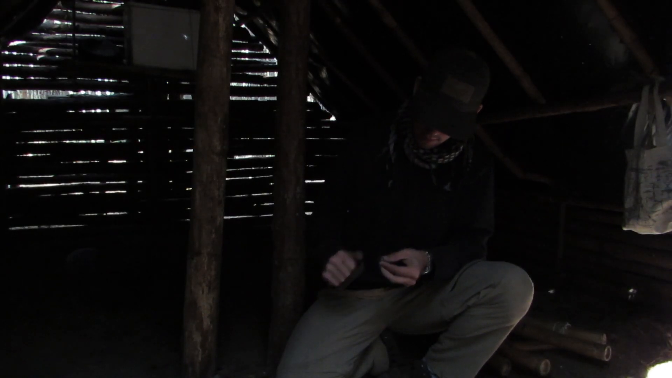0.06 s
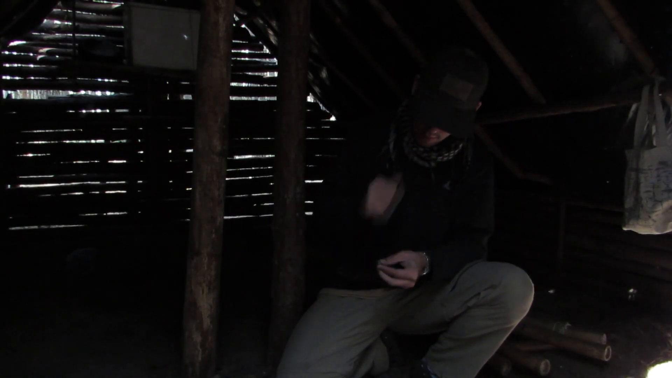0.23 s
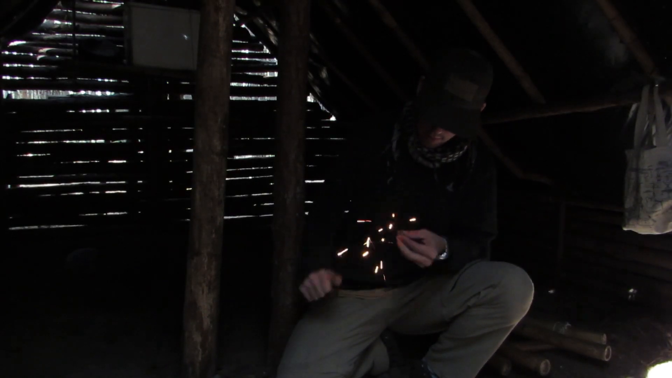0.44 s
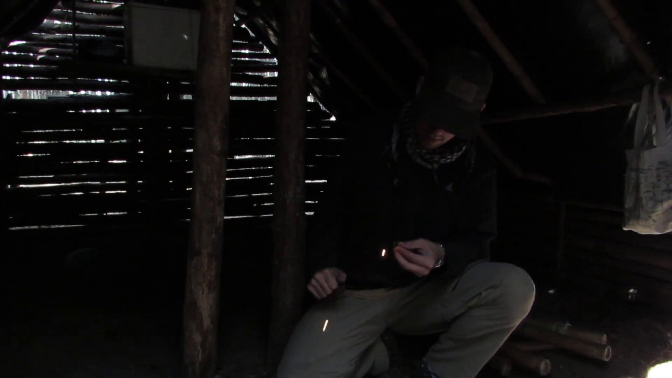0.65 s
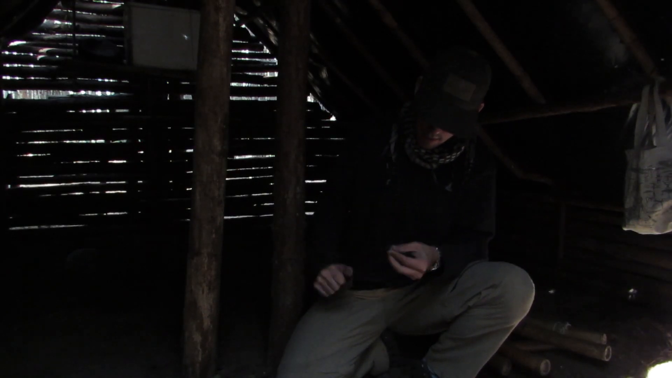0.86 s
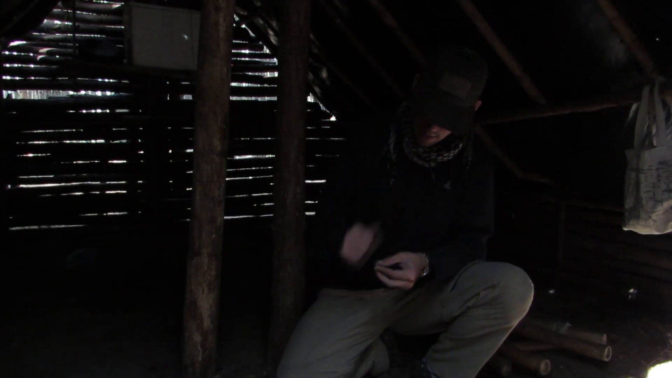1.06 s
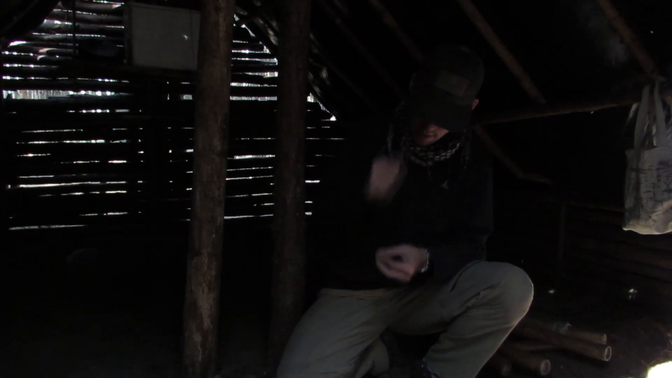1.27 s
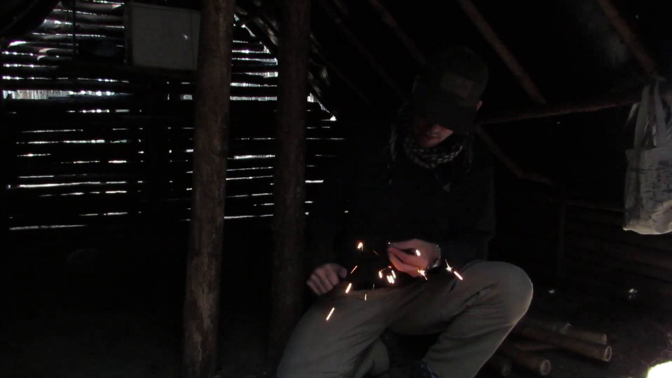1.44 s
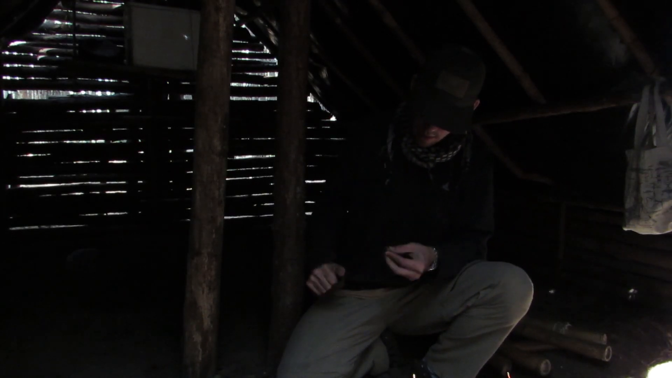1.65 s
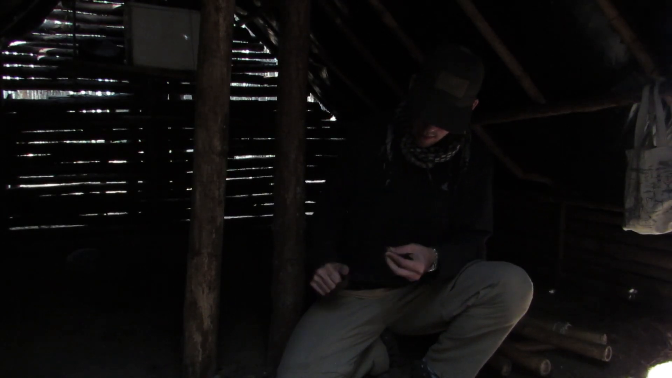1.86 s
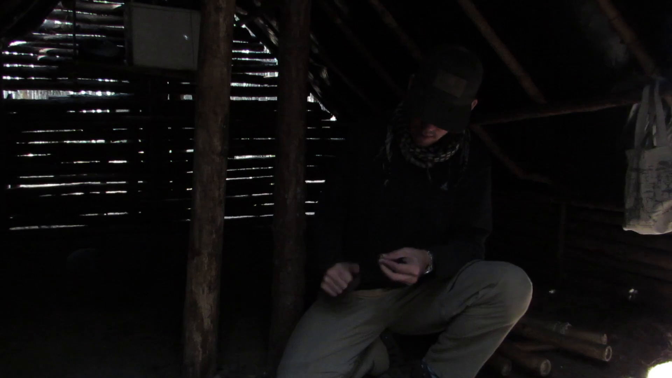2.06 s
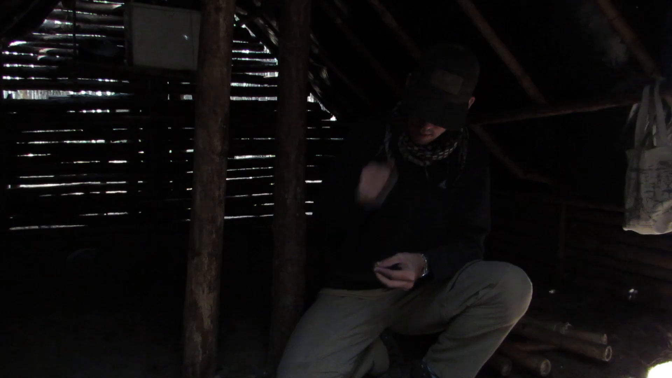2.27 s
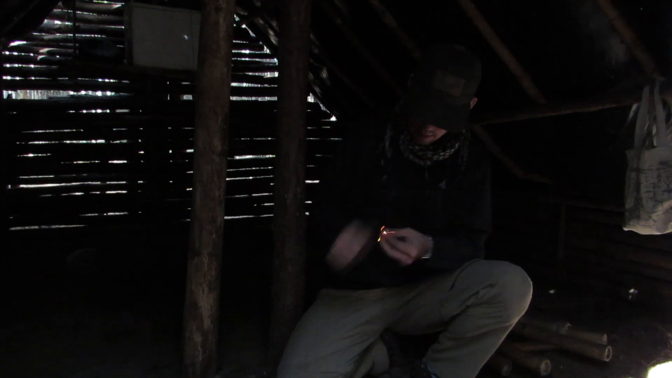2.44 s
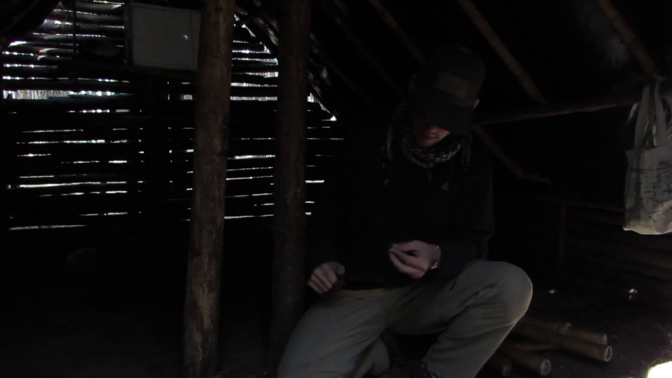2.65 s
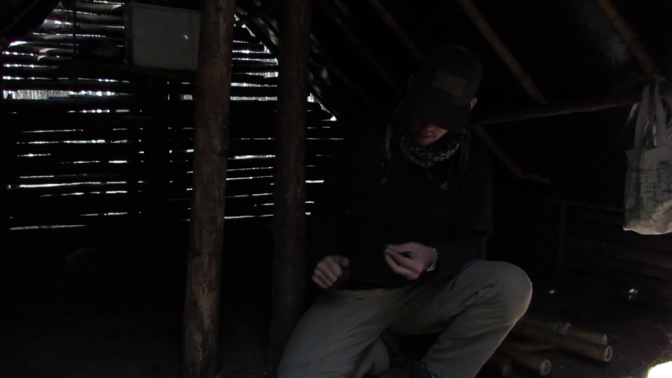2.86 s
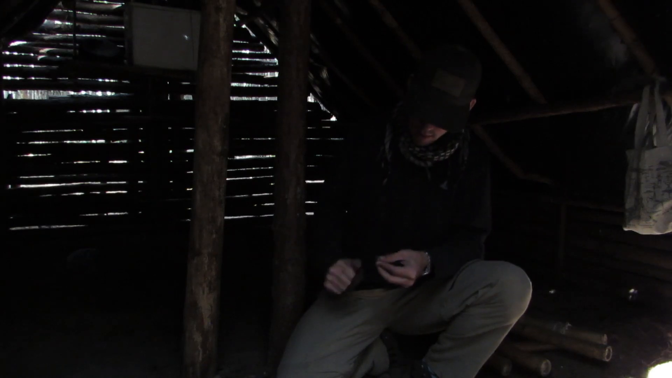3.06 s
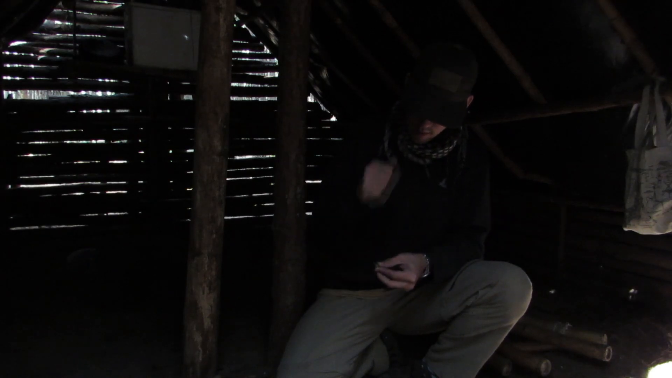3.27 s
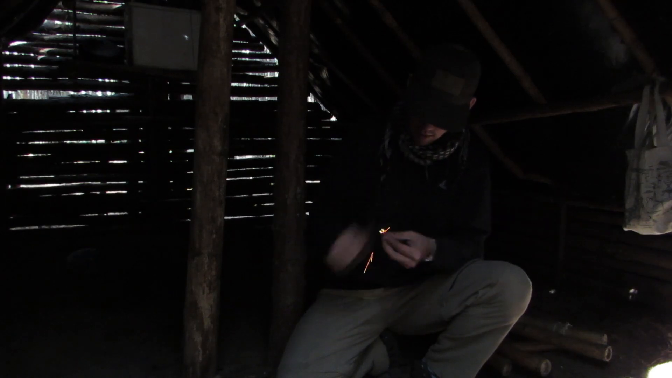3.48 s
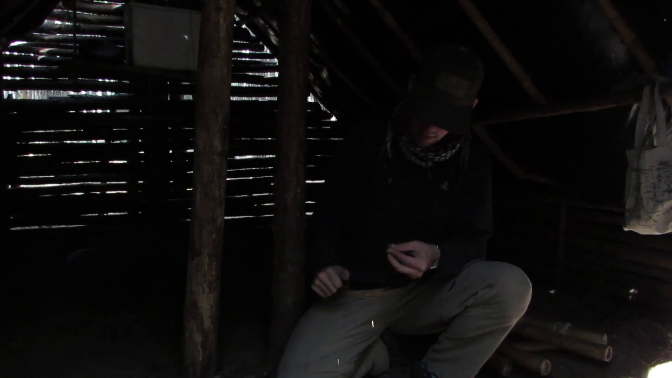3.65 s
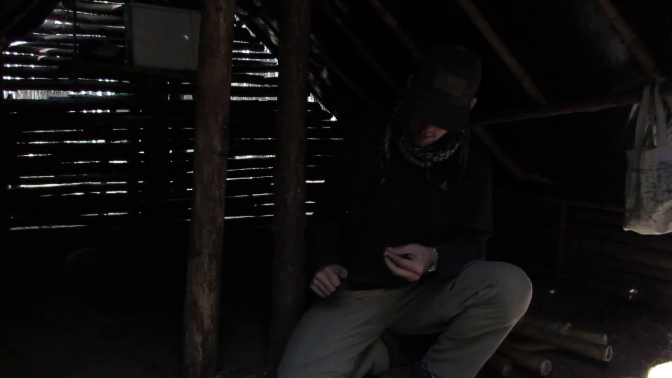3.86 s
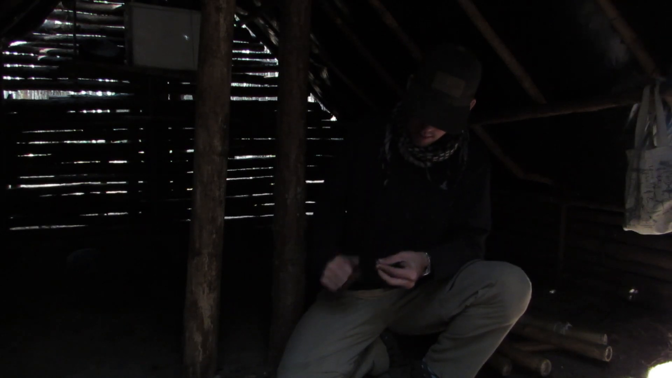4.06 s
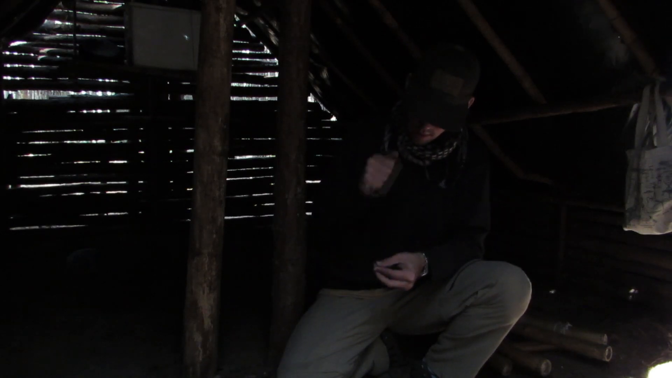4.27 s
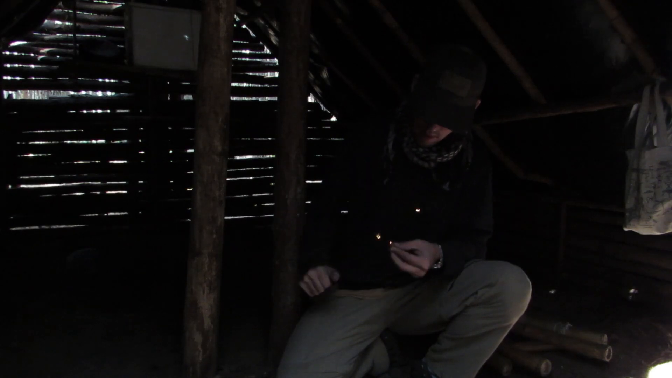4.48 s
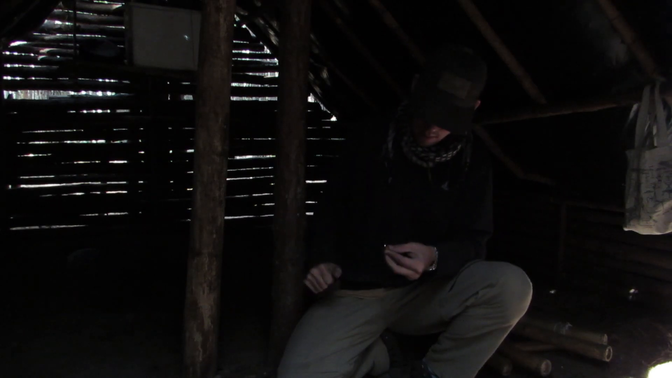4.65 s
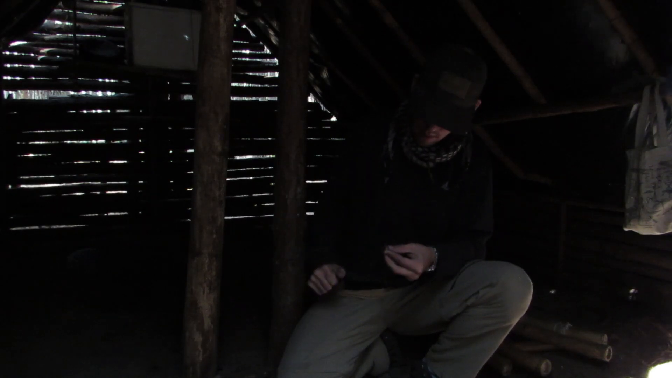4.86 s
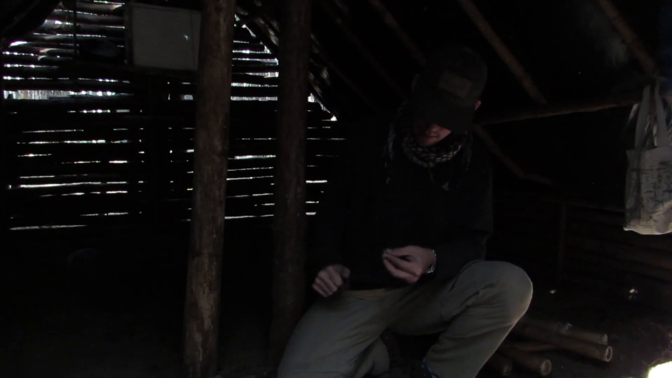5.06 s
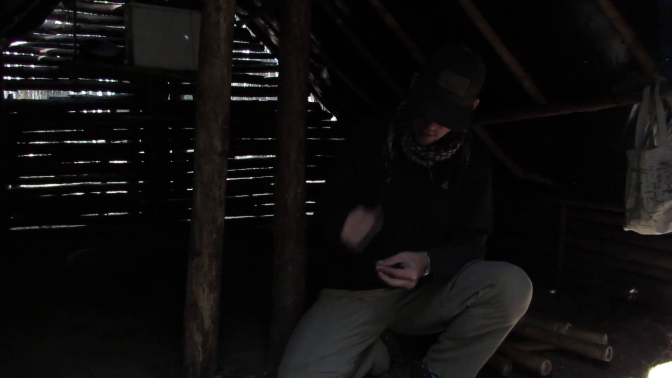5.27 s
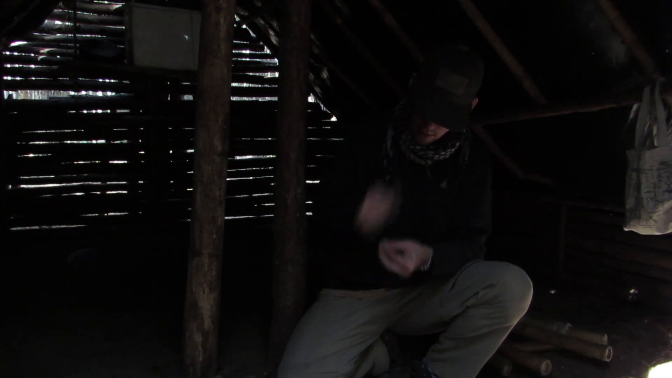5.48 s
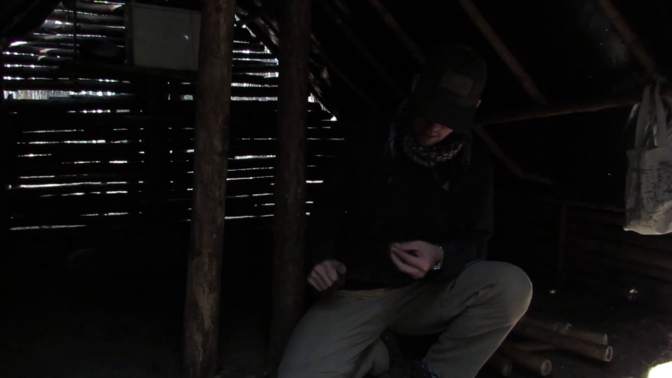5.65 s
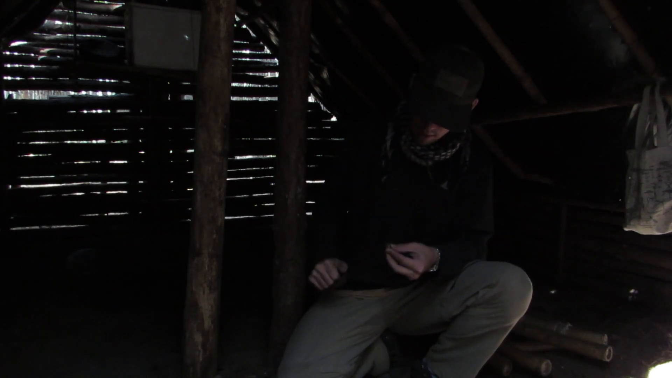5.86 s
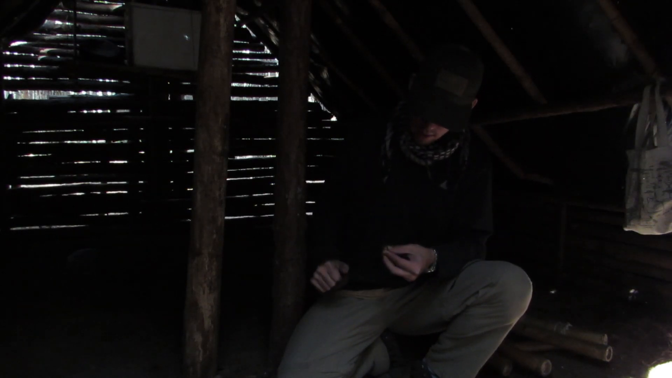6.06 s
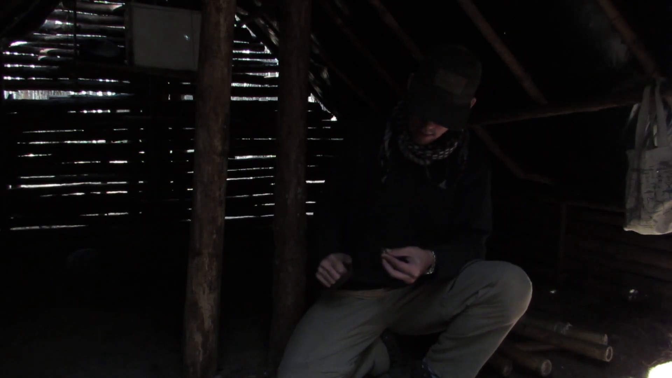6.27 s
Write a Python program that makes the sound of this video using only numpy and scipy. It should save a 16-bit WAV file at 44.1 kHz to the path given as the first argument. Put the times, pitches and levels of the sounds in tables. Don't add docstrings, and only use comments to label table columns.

```python
import sys
import numpy as np
from scipy import signal
from scipy.io import wavfile
from scipy.ndimage import uniform_filter1d

SR = 44100
rng = np.random.default_rng(int(sys.argv[2]) if len(sys.argv) > 2 else 0)


def volts_from_db(level):
    exponent = np.asarray(level, float) / 20
    return 10 ** exponent


def bounce(signal):
    frames = np.transpose(np.atleast_2d(signal))
    limited = np.clip(frames, -1, 1)
    pcm = np.round(limited * 32767).astype(np.int16)
    wavfile.write(sys.argv[1], SR, pcm)


N = 278701


def evened(x):
    return x / np.sqrt(np.mean(x ** 2) + 1e-20)


def read(points, hz):
    f, value = np.transpose(points)
    return np.interp(np.log(hz + 1), np.log(f + 1), value)


def add(mix, s, sound):
    part = mix[round(s * SR):][:len(sound)]
    part += sound[:len(part)]


def coloured(x, points):
    db = np.maximum(read(points, np.fft.rfftfreq(2048, 1 / SR)), -100)
    log_gain = np.log(volts_from_db(db))
    circle = np.concatenate([log_gain, log_gain[-2:0:-1]])
    taps = np.fft.ifft(np.exp(np.conj(signal.hilbert(circle)))).real[:1024]
    return signal.oaconvolve(x, taps)[:len(x)]


def resonate(x, hz, width):
    pole = np.exp((2j * np.pi * hz - np.pi * width) / SR)
    return 2 * signal.lfilter([1 - abs(pole)], [1, -pole], x).real


# (frequency [Hz], density [dB per Hz])
HISS_COMMON = [(18, -45), (30, -18), (333, -8.5), (421, -11), (574, -2), (688, -17), (804, -8), (1540, -14),
               (1790, -15.5), (2580, -16), (4000, -20), (4550, -20.5), (7260, -21.5), (12500, -30),
               (14600, -35)]
HISS_OPPOSED = [(18, -40), (30, -11.5), (70, -12.5), (271, -1.5), (559, -3.5), (670, -4), (744, -5),
                (1350, -11), (1840, -11.5), (3250, -18.5), (4000, -21.5), (7260, -23), (14600, -34.5)]


def hiss():
    size, hop, patchy_db = 1024, 256, 1.0
    hz = np.fft.rfftfreq(size, 1 / SR)

    def layer(points, db):
        a, b, patches = rng.standard_normal((N // hop + 5, len(hz), 3)).T
        patches = uniform_filter1d(patches, 10, 0)
        patches = evened(uniform_filter1d(patches, 14, 1))
        z = (a + 1j * b) * volts_from_db(read(points, hz)[:, None] + patchy_db * patches)
        return volts_from_db(db) * evened(signal.istft(z, nperseg=size, noverlap=size - hop)[1][:N])

    mid, side = layer(HISS_COMMON, -51), layer(HISS_OPPOSED, -47.5)
    return np.array([mid + 1.19 * side, mid - side])


# (frequency [Hz], width [Hz], level [dB], share that differs between the ports [0-1])
HUM_BANDS = [(65, 16, -70, .5), (243.7, 12, -74, .3), (515.8, 4.7, -62, .2), (572, 3.3, -57.5, 0.16),
             (640.4, 5.2, -62.5, .2), (805.6, 87, -57, .4), (1025, 15, -63, .3), (1189, 44, -65.5, .3),
             (1798, 76, -64, .4), (2543, 32, -69.5, .4)]


def hum():
    noise, out = rng.standard_normal((2, N)), np.zeros((2, N))
    for hz, width, db, apart in HUM_BANDS:
        band = resonate(resonate(noise, hz, 2 * width), hz, 2 * width)
        mid, side = volts_from_db(db) * evened(band)
        out += [mid + apart * side, mid - apart * side]
    return out


# (time [s], level [dB], hold [s])
AIR_PUFFS = [(.365, -48, .015), (1.28, -66.5, .02), (1.565, -44.5, 0.024), (1.88, -69.5, 0.085),
             (2.9, -51.5, .15), (3.15, -49, 0.069), (3.52, -62.5, .02), (3.63, -59, 0.016),
             (3.94, -65, .08), (4.25, -72, 0.16), (5.53, -56, 0.026), (5.63, -59.5, .05),
             (5.98, -67.5, 0.083), (6.11, -53, .03), (6.28, -62.5, .05)]


def draught():
    rise_s, fall_db_per_s = 0.008, 279.5
    calm_db, flutter_db, flutter_s = -74, 5.5, 0.08
    t = np.arange(N) / SR
    rumble_band = signal.butter(2, [18, 57.5], "band", fs=SR, output="sos")
    mid, side = evened(signal.sosfilt(rumble_band, rng.standard_normal((2, N))))
    span = round(flutter_s * SR)
    flutter = evened(uniform_filter1d(uniform_filter1d(rng.standard_normal(N), span), span))
    air = volts_from_db(calm_db + flutter_db * flutter)
    for s, db, held in AIR_PUFFS:
        rise = np.exp(np.minimum(t - s, 0) / rise_s)
        air += rise * volts_from_db(db - fall_db_per_s * np.maximum(t - s - held, 0))
    return volts_from_db(11) * air * np.array([0.2 * mid + 1.1 * side, 0.2 * mid - side])


# (frequency [Hz], t60 [s])
HUT_DECAY = [(300, 0.14), (1500, 0.078), (4000, 0.094), (8000, 0.092), (14000, 0.077)]


def hut(x):
    port_gap = 3
    at = np.arange(20, 8000, 10) + rng.integers(0, 10, (3, 1, 798))
    both_ports = np.concatenate([at, at + rng.integers(-port_gap, port_gap, at.shape)], axis=1)
    taps = np.zeros((3, 2, 8192))
    np.put_along_axis(taps, both_ports, rng.choice([-1.0, 1.0], at.shape), axis=2)

    hz, t, z = signal.stft(taps, SR, nperseg=128)
    fade = volts_from_db(-60 * t / read(HUT_DECAY, hz)[:, None])
    tails = signal.istft(z * fade, SR, nperseg=128)[1]
    tails *= np.clip(1.1 + np.arange(tails.shape[2]) / SR / 0.0088, 0, 1)
    tails /= np.linalg.norm(tails, axis=2, keepdims=True)

    phase = 40 * np.arange(N) / SR + np.arange(3)[:, None] / 3
    blend = np.sqrt(2 / 3) * np.cos(np.pi * phase)
    return sum(signal.oaconvolve((x * blend[k])[None], tails[k], axes=1)[:, :N] for k in range(3))


# (middle [s], half length [s], level [dB], centre [Hz])
SLEEVE_BRUSHES = [
    (0.553, 0.038, -50, 10000),
    (.675, 0.023, -55, 12500),
    (1.49, 0.03, -53, 10000),
    (1.588, 0.067, -55, 10000),
    (2.581, 0.046, -49, 6000),
    (4.545, 0.03, -47, 8000),
    (4.584, 0.023, -49, 7900),
    (5.663, 0.06, -51.5, 7000),
]


def sleeve():
    t, out = np.arange(N) / SR, np.zeros(N)
    fibres = rng.standard_normal(N)
    grain = evened(uniform_filter1d(rng.standard_normal(N), 90))
    fibres = fibres * volts_from_db(2.5 * grain)
    for s, half, db, hz in SLEEVE_BRUSHES:
        swell = np.exp(-((t - s) / half) ** 2)
        out += volts_from_db(db) * swell * evened(resonate(resonate(fibres, hz, 1.5 * hz), hz, 1.5 * hz))
    return signal.sosfilt(signal.butter(4, 13800, fs=SR, output="sos"), out)


# (time [s], level [dB], frequency [Hz], t60 [s])
SMALL_KNOCKS = [(0.574, -32, 2350, 0.025), (.623, -34.5, 960, 0.04), (.69, -41.5, 1300, .03),
                (1.499, -36.5, 2920, .015), (1.61, -43, 3650, .04), (1.70, -46, 3650, .04),
                (1.499, -44, 12000, .015), (2.533, -27, 9400, 0.015), (2.575, -31.5, 2250, 0.037),
                (2.576, -44, 6500, 0.017), (2.610, -35.5, 3180, 0.017), (2.611, -37, 5510, 0.036),
                (3.813, -41, 1220, 0.039), (4.534, -37, 2240, 0.018), (4.5427, -27.5, 2300, 0.023),
                (4.544, -31.5, 6900, .02), (4.553, -37, 2090, 0.066), (4.574, -32, 3250, 0.031),
                (4.582, -34.5, 3500, 0.017), (4.576, -32.5, 5500, 0.033), (4.593, -46, 1290, .03),
                (5.604, -25, 9400, 0.011)]
# (time [s], level [dB])
HAND_THUDS = [
    (.417, -48.5),
    (1.366, -41),
    (2.476, -46),
    (3.179, -45),
    (3.517, -41),
    (4.438, -47),
    (5.555, -41),
]
# (frequency [Hz], level [dB], t60 [s])
HAND_MODES = [(283, -7, 0.03), (480, -6, 0.022), (800, 0, 0.034)]


def ticks():
    out, t = np.zeros(N), np.arange(4000) / SR
    thuds = [(s, db + mode_db, hz, t60) for s, db in HAND_THUDS for hz, mode_db, t60 in HAND_MODES]
    for s, db, hz, t60 in list(SMALL_KNOCKS) + thuds:
        puff = rng.standard_normal(len(t)) * volts_from_db(-60 * t / t60)
        knock = resonate(resonate(puff, hz, 0.33 * hz), hz, 0.24 * hz)
        add(out, s, volts_from_db(db) * knock / abs(knock).max())
    return out


# (time [s], force [dB], brightness: treble up and low grit down [dB], grit t60 [s])
EDGE_CATCHES = [(0.4142, -12.5, 1.5, .022), (0.4162, -8.5, -0.5, 0.0087), (.4190, -8.5, 2, .019),
                (.4240, -18.5, 6.5, .023), (0.429, -27, -2.5, 0.037), (0.448, -27, 3.5, .02),
                (1.364, -20, 8, 0.016), (1.3656, -11.5, 1.5, 0.026), (1.3700, -12.5, 1, 0.024),
                (1.3810, -21, 7, 0.048), (1.4000, -28.5, 11.5, 0.018), (2.4758, -11.5, 5.5, .022),
                (2.4816, -11, 3.5, 0.011), (2.4866, -12, 8, .014), (2.4909, -20, 5.5, 0.04),
                (3.1788, -19, 9.5, .016), (3.1816, -20.5, 5.5, 0.019), (3.1852, -25, 4, 0.023),
                (3.5166, -4, 9.5, .007), (3.5202, -14.5, 0.5, 0.026), (3.5310, -24, 6.5, .055),
                (4.437, -7.5, 4, .012), (4.439, -15, -0.5, 0.027), (4.4445, -9.5, 5, 0.009),
                (4.455, -24, 2.5, 0.026), (4.473, -30, 13, .011), (5.5509, -28, 8.5, .046),
                (5.5541, -6.5, 8, .011), (5.5584, -14, -1.5, 0.018), (5.5680, -25, 3, 0.11)]
GRIT_BANDS = (2000, 5500, 12000)
# (frequency [Hz], density [dB per Hz])
GRIT_COLOUR = [(150, -30), (500, -25.5), (1150, -16.5), (1600, -4.5), (2300, 0.5), (3000, -2.5),
               (4400, -3.5), (6800, -1), (8500, -5.5), (12500, -6.5), (13600, -6), (14300, -21),
               (16000, -39.5)]
# (frequency [Hz], level [dB], t60 [s])
STEEL_MODES = [
    [(2300, -6.5, 0.079), (3830, -7, .11), (4300, 4, .05), (5200, -8.5, 0.048), (7460, -4.5, 0.033)],
    [(2300, -0.5, 0.03), (3500, 2.5, 0.2), (5410, -5, 0.02), (6510, -15.5, 0.072), (11970, -18, .04)],
    [(3500, -3.5, 0.22), (5367, -4, 0.029), (12230, 2.5, 0.028), (13000, -2, 0.027)],
    [(1585, 4.5, 0.041), (4440, -3, 0.047), (5360, -9, .03), (9480, -2.5, 0.018), (12800, -3, .03)],
    [(2260, -2.5, 0.054), (3450, 7, 0.24), (4360, -15, 0.034), (6980, -14, 0.018)],
    [(1610, -12, .04), (2250, -3.5, 0.022), (3440, 1, 0.13), (4420, -2, 0.058), (9370, -9.5, 0.034)],
    [(1670, -6.5, 0.063), (2300, -9.5, 0.018), (3650, 3, 0.17), (6910, -4.5, 0.029), (12500, -2, 0.035)],
]


def strokes():
    hump_db = 1
    grain_db, attack_s = 2.5, 0.00051
    grit, t = np.zeros(N), np.arange(3000) / SR
    for s, force_db, bright_db, t60 in EDGE_CATCHES:
        crack, size = rng.standard_normal((2, len(t)))
        spray = evened(crack * volts_from_db(grain_db * np.clip(size, -2, 2)))
        fade = volts_from_db(-60 * t / t60) * np.minimum(t / attack_s, 1)
        db = force_db + np.array([-bright_db - hump_db, hump_db, bright_db - hump_db])
        add(grit, s, coloured(spray * fade, list(zip(GRIT_BANDS, db))))

    out = grit.copy()
    times = np.array([row[0] for row in EDGE_CATCHES])
    starts = times[np.diff(times, prepend=0) > 0.1]
    for s, modes in zip(starts, STEEL_MODES):
        drive = grit[round(s * SR):][:SR // 4]
        ring = sum(volts_from_db(db + 9) * resonate(drive, hz, 4 / t60) for hz, db, t60 in modes)
        add(out, s, ring)
    return volts_from_db(8) * coloured(out, GRIT_COLOUR)


def scene():
    struck = strokes()
    small = ticks() + sleeve()
    floor = hiss() + hum() + draught()
    echoes = volts_from_db(0.5) * hut(struck + volts_from_db(-6) * small)
    direct = (struck + small) * volts_from_db([[0.2], [-0.2]])
    return direct + echoes + floor


def low_pass(x):
    return signal.sosfilt(signal.butter(12, 15810, fs=SR, output="sos"), x)


# (time [s], loss [dB])
GAIN_DUCKS = [
    (.43, 0.5),
    (1.38, 1.5),
    (2.491, 8.5),
    (3.53, 2),
    (4.449, 2.5),
    (5.563, 9.5),
]
# (frequency [Hz], width [Hz], depth [0-1])
WHINE_NOTCHES = [(3940, 260, .72), (7872, 170, .9)]


def record(dry):
    t, lost_db, gap = np.arange(N) / SR, np.zeros(N), np.zeros(N)
    for s, db in GAIN_DUCKS:
        since = np.maximum(t - s, 0)
        back = 0.7 / (1 + (since / 0.4) ** 4) + 0.23 * np.exp(-since / 0.64)
        lost_db += db * np.minimum(since / 0.015, 1) * back
        gap += np.clip(db / 5, 0, 1) * np.exp(-((t - s - 0.04) / 0.026) ** 4)
    bass = signal.sosfiltfilt(signal.butter(2, 260, fs=SR, output="sos"), dry)
    x = (dry - gap * bass) / volts_from_db(lost_db)
    for hz, width, depth in WHINE_NOTCHES:
        x = x - depth * resonate(x, hz, width)
    x = signal.sosfilt(signal.cheby1(8, 1, 14600, fs=SR, output="sos"), x)
    return low_pass(np.clip(x, -1, 1))


dry = scene()
out = record(dry)
bounce(out)
```